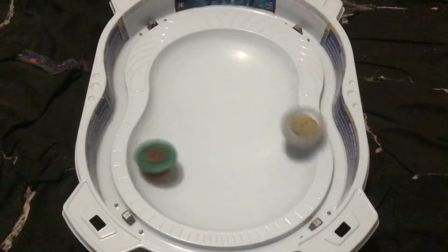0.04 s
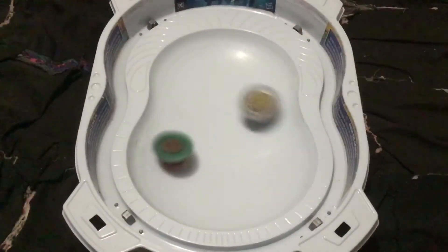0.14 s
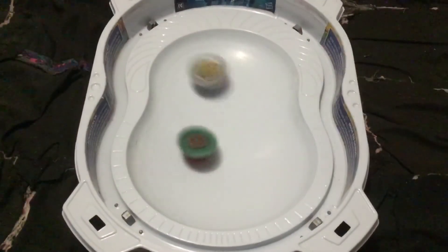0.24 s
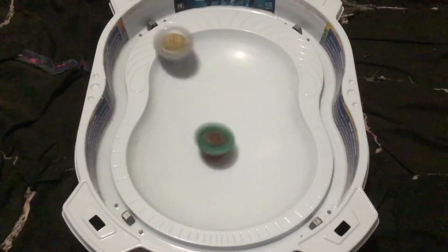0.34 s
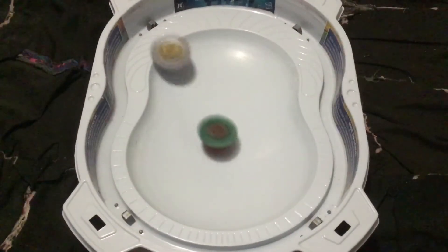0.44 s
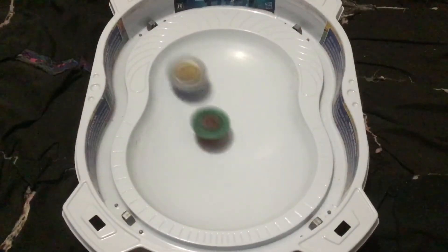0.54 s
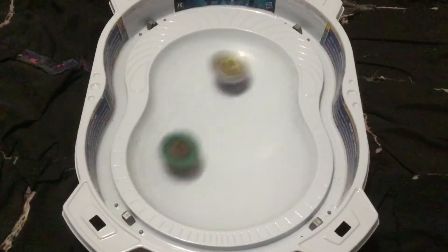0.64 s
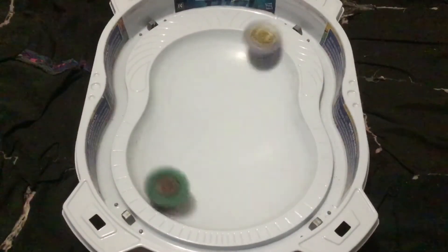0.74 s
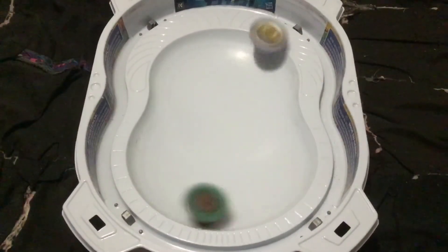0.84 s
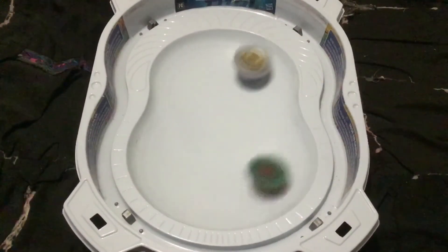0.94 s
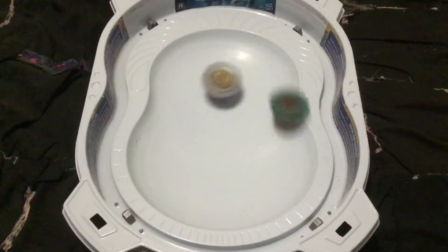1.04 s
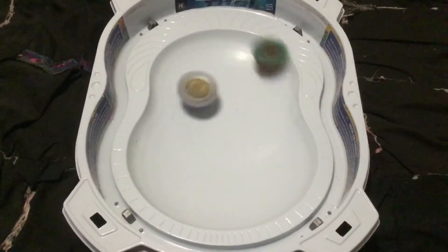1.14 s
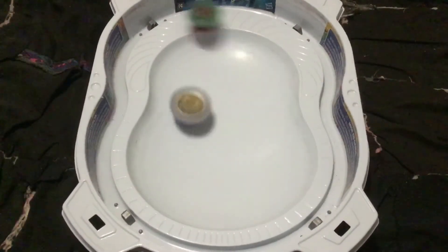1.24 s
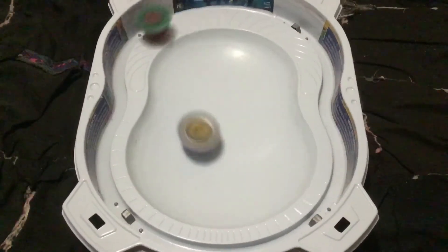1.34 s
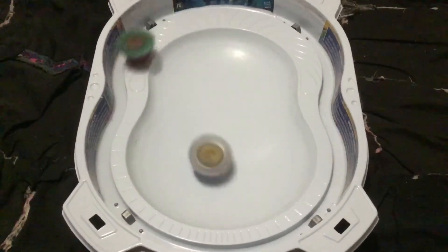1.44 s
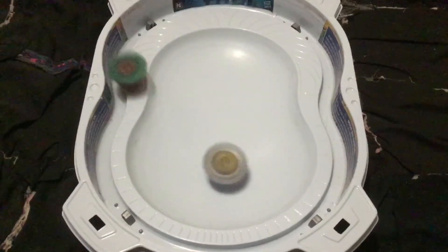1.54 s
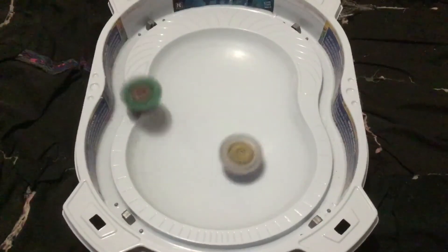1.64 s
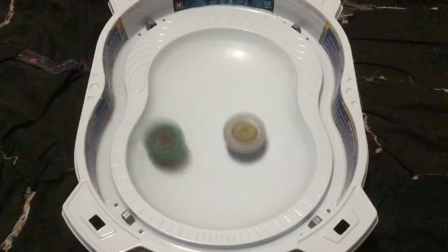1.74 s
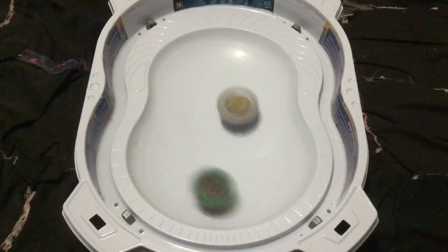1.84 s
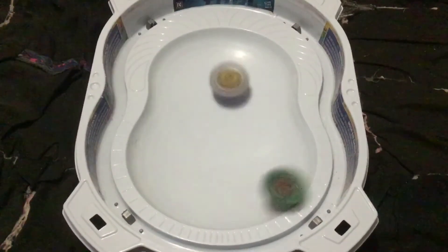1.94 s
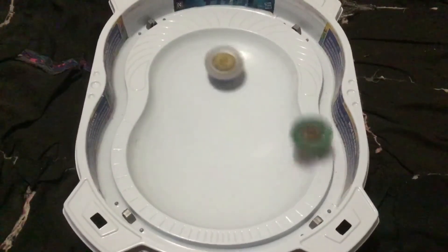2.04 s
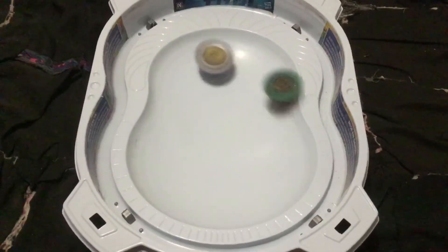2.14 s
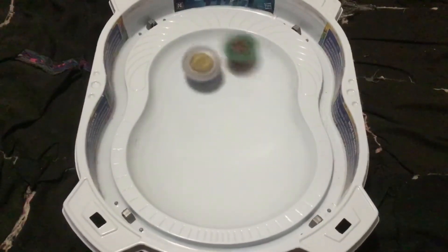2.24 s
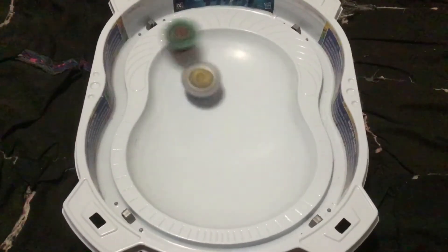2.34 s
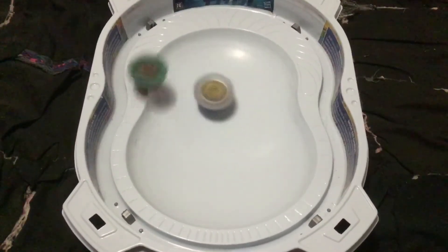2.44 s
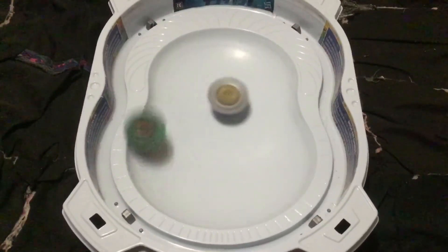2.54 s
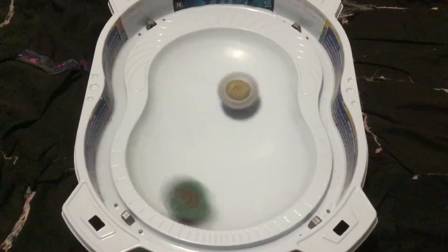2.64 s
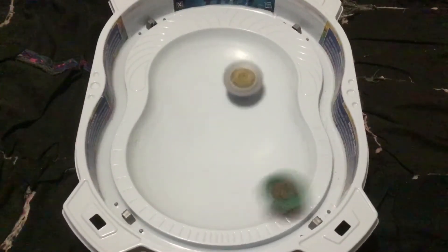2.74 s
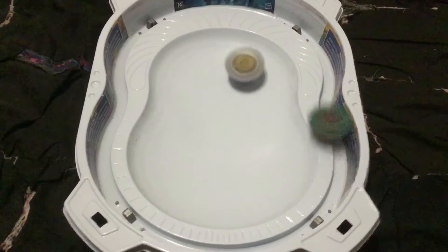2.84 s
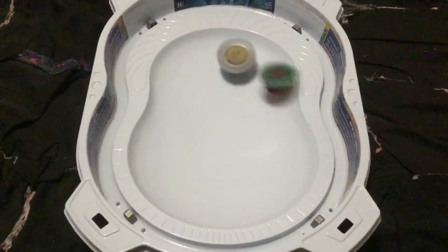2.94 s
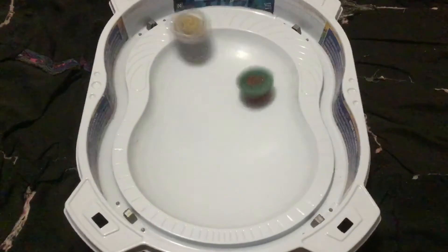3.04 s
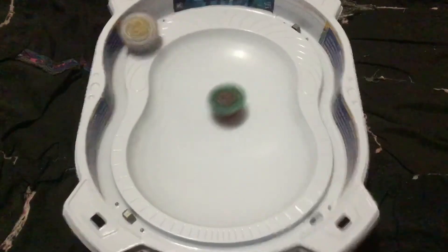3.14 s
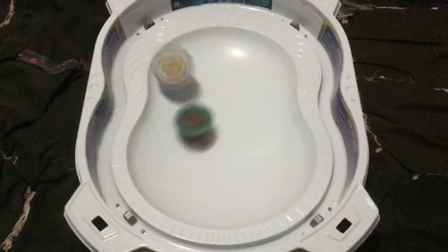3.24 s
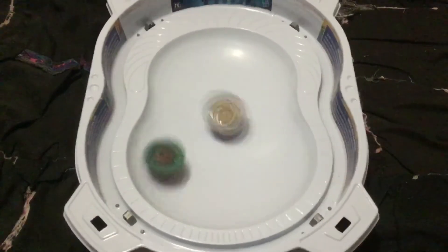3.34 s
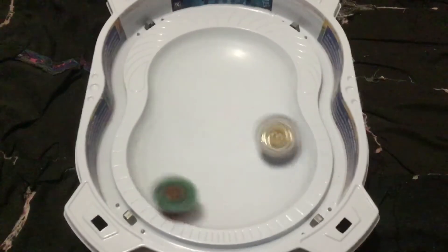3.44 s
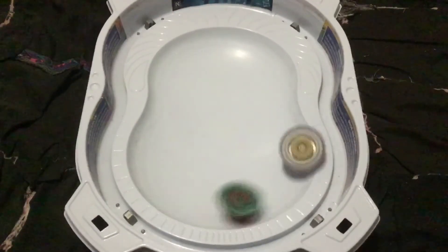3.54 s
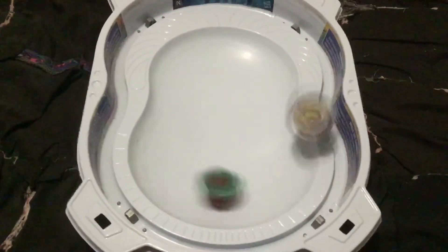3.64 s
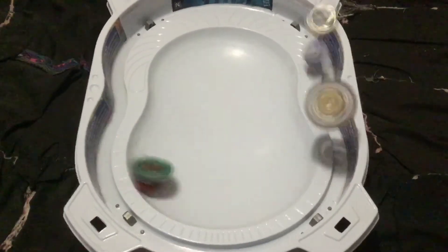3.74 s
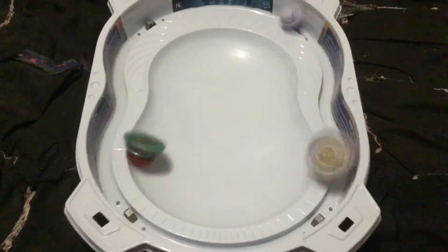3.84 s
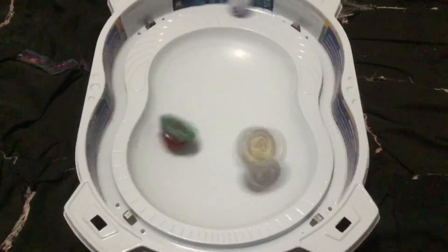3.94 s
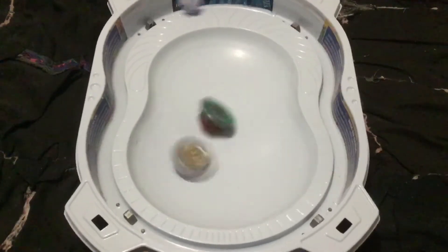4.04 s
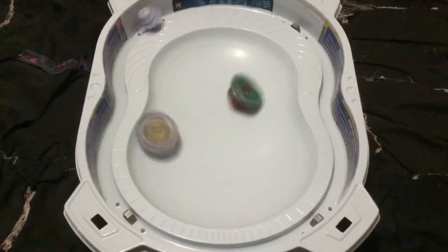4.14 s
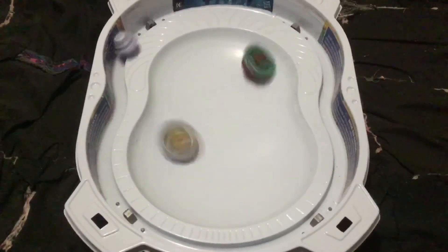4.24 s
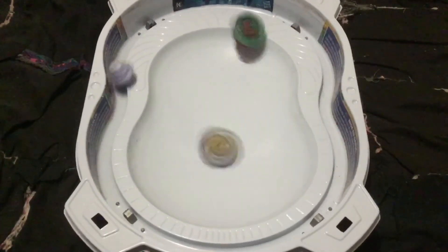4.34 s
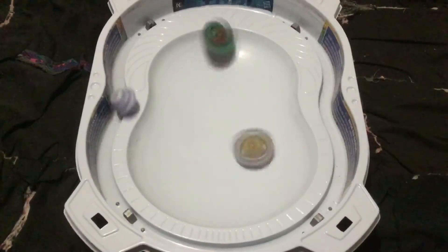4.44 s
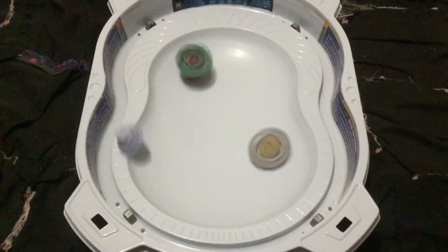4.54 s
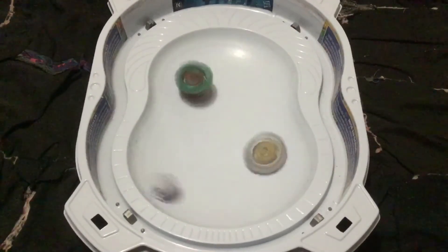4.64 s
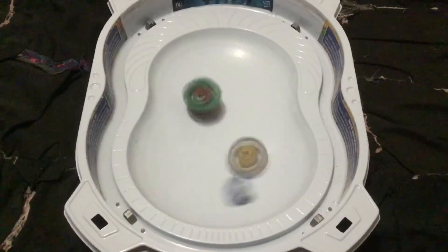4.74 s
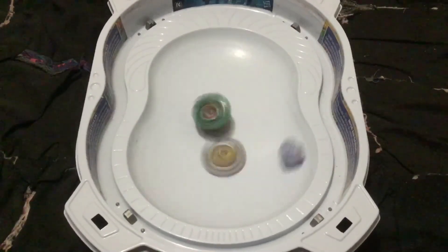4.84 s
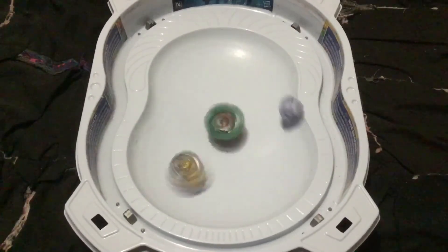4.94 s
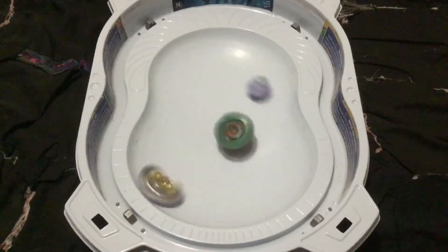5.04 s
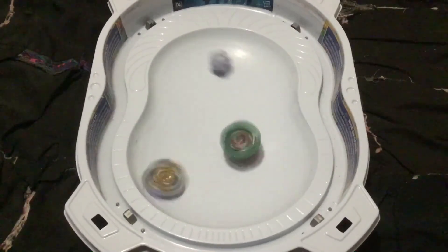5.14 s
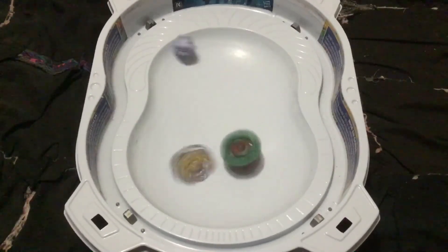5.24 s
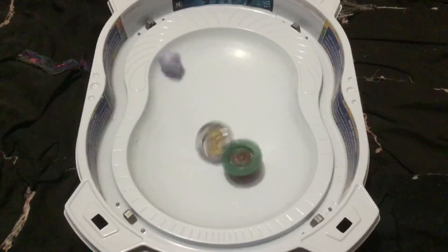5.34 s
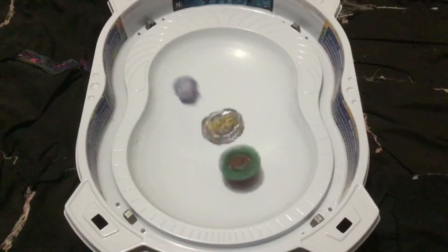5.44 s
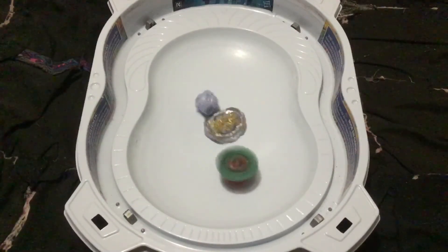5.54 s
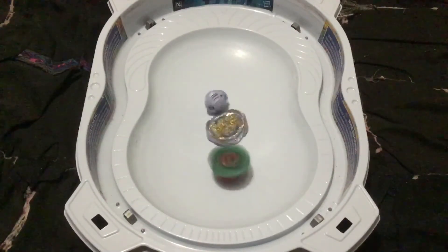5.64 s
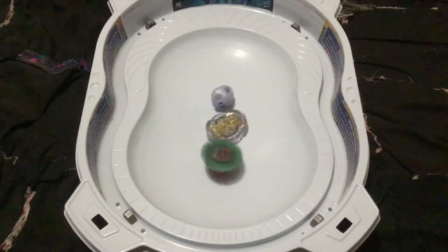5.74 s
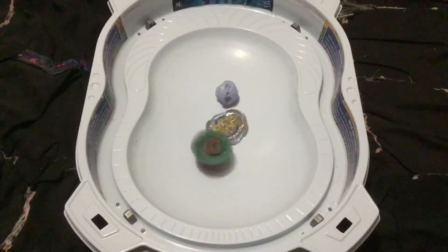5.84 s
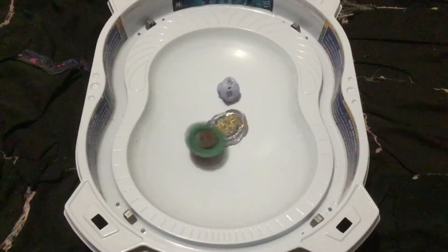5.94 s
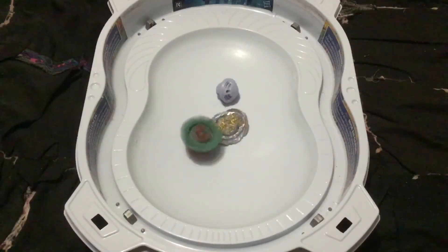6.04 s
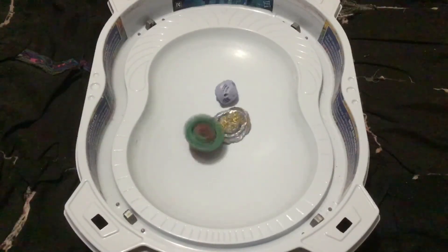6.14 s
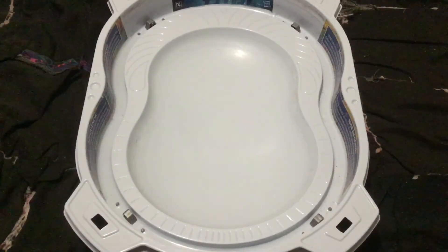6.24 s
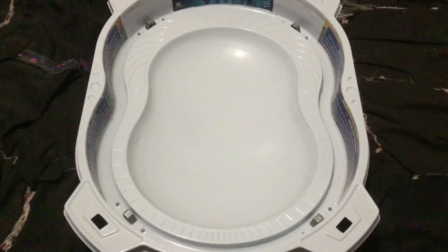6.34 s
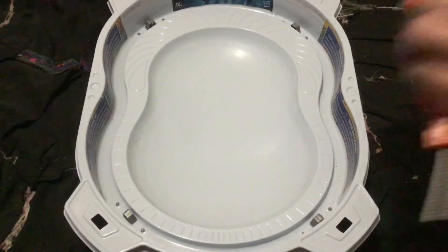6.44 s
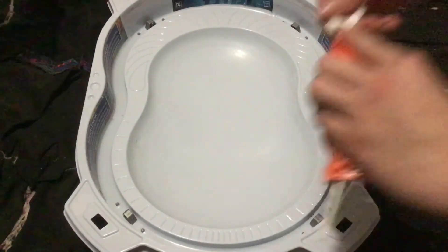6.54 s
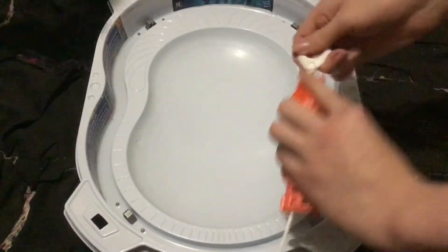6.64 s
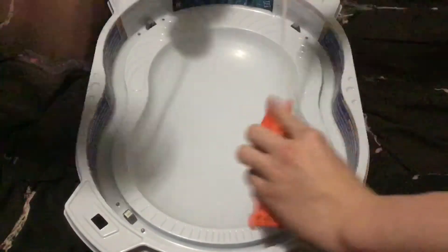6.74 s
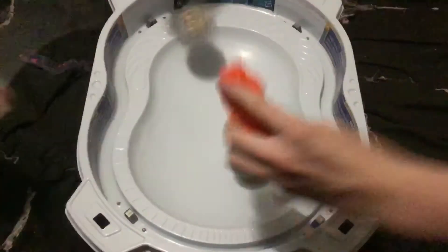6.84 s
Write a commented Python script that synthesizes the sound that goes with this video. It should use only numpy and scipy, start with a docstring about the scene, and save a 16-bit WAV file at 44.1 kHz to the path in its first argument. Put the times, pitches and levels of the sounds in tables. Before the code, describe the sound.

Hollow plastic knocks, buzzing rail scrapes and hard metallic clacks come in quick, irregular bursts as two tops battle in a toy bowl, miked closely from above in a small dry room. After one breaks apart its pieces clatter lightly and settle into weak whirring. An abrupt cut leaves quiet; then a short rising ripcord rip with clicking teeth and several deep, drum-like thumps.

```python
"""In a small room, from close above a thin plastic stadium, one microphone hears two spinning tops.
They roll, grind along the ribbed rail and clash; noisy forces and blows ring the bowl's resonances.
One bursts, and its parts tumble round the bowl in light taps; the rolling and rattling is then cut off.
In a second scene a ripcord launcher zips, its teeth clicking, and fresh tops thud onto the bowl's floor."""
import sys
import numpy as np
from scipy import signal
from scipy.fft import rfft, irfft, next_fast_len
from scipy.io import wavfile
from scipy.ndimage import map_coordinates

SR = 44100
rng = np.random.default_rng(int(sys.argv[2]) if len(sys.argv) > 2 else 0)


def persist_wave(psi):
    """Save psi, clipped to +-1, as 16-bit WAV."""
    counts = np.round(np.clip(psi, -1, 1) * 32767).astype(np.int16)
    wavfile.write(sys.argv[1], SR, np.atleast_2d(counts).T)


N = 303849

TIME = np.arange(N) / SR  # s from the start
AGE = np.arange(16384) / SR  # s from a blow
# bands of the bowl's sound, Hz
THUD, FLOOR, WALL, CRACK = (75, 380), (400, 900), (950, 2200), (2200, 6500)
METAL = (3000, 17000)  # band of the ringing discs, Hz


def rolling(grain_rate=1800, spread_db=4, spin_hz=48, throb_db=7, bump_rate=90, parts_rumble_db=-4):
    """Tips and loose parts catch on the plastic in tiny slips, harder once a turn, and hop over its bumps."""
    run_rumble, run_shell, run_scrape = runs()
    parts_gain = amp(rattle_db(TIME)) * (TIME > RATTLE[0][0])
    clatter, parts_scrape = parts_gain

    # slips per second, the spin rate wandering about spin_hz
    turns = np.cumsum(spin_hz * amp(1.5 * wobble(3))) / SR
    slip_happens = rng.random(N) < grain_rate / SR
    slips = slip_happens * rng.standard_normal(N) * amp(spread_db * rng.standard_normal(N))
    force = unit(np.tanh(slips / 4)) + .5 * rng.standard_normal(N)
    force = force * amp(throb_db * np.sin(2 * np.pi * turns))
    force = force + amp(-3.5) * signal.fftconvolve(force, echoes(count=1)[0])[:N]

    # the tips wander over the bowl, so the mix of its resonances keeps changing
    spots = bowl(np.tile(force, (3, 1)), scatter_db=2.5)
    wandering = sum(spot * wobble(13) for spot in spots)
    steady = bowl(force)

    bumps = (rng.random(N) < bump_rate / SR) * rng.uniform(0.76, 1, N)
    tip_rumble = unit(band(bowl(unit(bumps) + 0.14 * unit(force)), THUD)) * run_rumble
    parts_rumble = unit(band(steady, (170, 380))) * clatter * amp(parts_rumble_db)
    shell = unit(band(unit(steady) + .5 * unit(wandering), (FLOOR[0], WALL[1])))
    shell = shell * np.hypot(run_shell, clatter)
    scrape = unit(band(steady, (2500, 15000))) * np.hypot(run_scrape, parts_scrape)
    return (tip_rumble + parts_rumble + shell + scrape) * until_cut()


# a top runs over the floor between two jumps; levels once it has settled
# columns: touch-down t/s, lift-off t/s, rumble level/dB, scrape level/dB
RUNS = [(0, 0.224, -38.5, -50.5), (0.244, 0.517, -36, -48), (0.585, 0.975, -33.5, -46),
        (1.073, 1.461, -41, -53), (1.485, 1.66, -39.5, -51), (1.688, 2.032, -40.5, -45),
        (2.103, 2.406, -36, -46.5), (2.489, 2.9, -39, -46), (2.941, 3.08, -47.5, -45.5),
        (3.09, 3.216, -40.5, -48.5), (3.241, 3.53, -49, -44), (3.54, 3.703, -42.5, -48),
        (3.976, 5.33, -40, -54.5)]
TOUCH_S, SETTLE_S, LIFT_T60 = 0.004, 0.097, 0.27  # s: a run sets in, calms down, dies away
LANDING_DB, LANDING_SCRAPE_DB = 13, 7.5  # extra level just after touch-down
RUN_SHELL_DB = -43  # the bowl's ring under a calmly running top


def runs():
    """Gains of rumble, bowl and scrape: a top lands roughly, settles, and fades when it lifts off."""
    rumble = shell = scrape = 0
    for start, end, rumble_db, scrape_db in RUNS:
        age = np.maximum(TIME - start, 0)
        touch = np.minimum(age / TOUCH_S, 1) * fade(LIFT_T60, np.maximum(TIME - end, 0))
        unrest = np.exp(-age / SETTLE_S)
        pressure = touch * amp(LANDING_SCRAPE_DB * unrest)
        rumble = rumble + touch * amp(rumble_db + LANDING_DB * unrest)
        shell = shell + pressure * amp(RUN_SHELL_DB)
        scrape = scrape + pressure * amp(scrape_db)
    return rumble, shell, scrape


# passes along the ribbed rail, levels at the loudest moment
# columns: loudest t/s, rasp level/dB, rise t/s, fall t/s, one turn of the top t/s,
# body of the bites level/dB, their crack level/dB
PASSES = [(.016, -23.5, 0.12, 0.1034, 0.026, -23, -25), (1.148, -51, 0.086, .014, 0.016, -19.5, -24),
          (1.959, -31, 0.12, 0.089, 0.017, -23, -31.5), (2.314, -28, 0.1, 0.091, 0.019, -17, -27),
          (2.722, -26, 0.15, 0.052, 0.02, -22, -31), (2.794, -25.5, .02, 0.074, .02, -29.5, -47),
          (3.099, -31.5, .04, 0.085, .02, -46, -48), (3.792, -36, .12, 0.079, 0.02, -21, -25),
          (3.966, -49.5, 0.1, .024, 0.027, -20, -25)]


def grinding(rib_hz=260, spin_hz=54, throb_db=3, floor_db=-3):
    """A top races along the rail: its toothed tip rasps over the ribs, pressing harder once a turn."""
    gain = sum(amp(db + swell_db(TIME - s, rise, fall)) for s, db, rise, fall, *_ in PASSES)
    # both rates wander about their settings
    ribs = np.cumsum(rib_hz * amp(2.5 * wobble(40))) / SR % 1
    turns = np.cumsum(spin_hz * amp(1.0 * wobble(14))) / SR
    force = rng.standard_normal(N) * np.exp(-3.5 * ribs) * amp(throb_db * np.sin(2 * np.pi * turns))
    shell = bowl(force)
    rail = unit(band(shell, (750, 6000))) + .5 * unit(band(force, (700, 2800)))
    return (unit(rail) + amp(floor_db) * unit(band(shell, FLOOR))) * gain


def bites(count=4, contact_s=.02, thud_db=-17, floor_db=-2, tick_db=-19, edge_share=1.0):
    """On the rail the top's edge bites once a turn, body and crack swelling with the pass."""
    rows = []
    for s, _, rise, fall, turn, body_db, crack_db in PASSES:
        for t in turn * np.arange(-count, count + 1):
            if -rise < t < fall and s + t > 0:
                rows.append((s + t, body_db, crack_db, swell_db(t, rise, fall)))
    s, body_db, crack_db, swell = np.transpose(rows)
    body, edge = body_db + swell, crack_db + edge_share * swell
    levels = (body + thud_db, body + floor_db, body, edge, edge + tick_db)
    return bowl_blows(s, contact_s, push_db=-0.5, levels=levels)


PASS_DROP_DB, PASS_SHAPE = 30.5, 1.8  # fall in level over the rise or fall time; roundness of the swell


def swell_db(t, rise, fall):
    """Level of a pass along the rail, t seconds from its loudest moment."""
    return -PASS_DROP_DB * np.abs(np.where(t < 0, t / rise, t / fall)) ** PASS_SHAPE


# hard blows against the rail
# columns: t/s, floor level/dB, wall level/dB, crack level/dB
KNOCKS = [(.3, -28.5, -26, -31.5), (.334, -11.5, -12.5, -22), (.369, -15.5, -14, -23),
          (0.39, -28, -34, -29.5), (.656, -9, -11.5, -16.5), (.7345, -14.5, -16.5, -23.5),
          (0.789, -21, -22, -29), (0.8242, -10.5, -16, -19), (1.463, -32, -19.5, -25.5),
          (1.591, -36.5, -32, -41), (1.66, -29, -37, -33.5), (1.884, -23.5, -30, -33),
          (2.785, -24, -22.5, -30), (2.792, -28, -21, -27.5), (2.959, -23.5, -22.5, -26.5),
          (3.104, -22, -27.5, -58), (3.613, -26, -22, -38), (3.807, -13.5, -20.5, -20),
          (4.028, -44, -26.5, -31.5), (4.231, -27, -23.5, -37), (4.482, -26.5, -29.5, -36),
          (4.514, -31, -30, -42), (5.238, -30, -36, -35.5)]


def knocks(contact_s=0.027, push_db=2, clean_slope=0.27, thud_db=-14, tick_db=-14):
    """A top slams into the rail and rings floor and wall; thud follows floor, tick follows crack."""
    s, floor_db, wall_db, crack_db = np.transpose(KNOCKS)
    # a square hit is one clean push, a graze mostly chatter
    square_db = clean_slope * (floor_db - np.median(floor_db))
    levels = (floor_db + thud_db, floor_db, wall_db, crack_db, crack_db + tick_db)
    return bowl_blows(s, contact_s, push_db + square_db, levels)


# top against top, levels before the trims in clashes()
# columns: t/s, clack, thud, floor, wall, treble level/dB
CLASHES = [(0.5167, -5, -58, -21, -25.5, -9.5), (1.2325, -13, -30.5, -21.5, -17.5, -25),
           (2.905, -4.5, -28, -22.5, -24, -10), (3.077, -16, -34.5, -26.5, -18.5, -30),
           (3.2184, -24.5, -50, -35.5, -40.5, -34.5), (3.5405, -4.5, -26, -25, -24.5, -11.5),
           (4.836, -18.5, -48, -29.5, -32, -29), (5.45, -28.5, -34, -35, -34.5, -36),
           (5.9689, -46, -65, -71, -59.5, -56), (6.0219, -38, -52, -49.5, -44, -55),
           (6.0946, -41.5, -48, -46.5, -47.5, -56)]
# colour of the clack; columns: f/Hz, density level/dB per Hz
CLACK = [(1000, -9), (2500, -3), (4000, 2), (6000, -0.5), (9000, -8), (13000, -14), (16000, -13.5)]


def clashes():
    """The tops' edges clack and the recoil thumps the bowl."""
    s, clack_db, thud_db, floor_db, wall_db, treble_db = np.transpose(CLASHES)
    edges = contacts(len(s), t60=0.039, push_db=-6.5, room_db=-3.0)
    clack = filtered(edges, lambda hz: amp(along(CLACK, hz)))
    tops = strike(s + 0.0011, clack, [((2200, 8000), clack_db - 8.5), ((8000, 17000), treble_db - 5.0)])
    recoil = bowl(contacts(len(s), t60=.02, push_db=2.5, room_db=1), scatter_db=2.5)
    parts = [(THUD, thud_db + 4.5), (FLOOR, floor_db + 5.5), (WALL, wall_db + 1.5)]
    return tops + strike(s + .0015, recoil, parts)


# blows that set a top's disc ringing
# columns: t/s, level/dB, sustain (times the disc's t60), most excited f/Hz
RINGS = [(0.516, -23, 1.5, 13400), (0.657, -29, 0.79, 12260), (.825, -33.5, 1.18, 12400),
         (2.903, -22, 1.7, 12280), (3.079, -29, 0.23, 6260), (3.219, -37, 0.63, 5900),
         (3.541, -34.5, 1.8, 9900), (4.837, -35.5, 1.8, 4020), (5.45, -52.5, .8, 4350),
         (6.023, -45, 0.69, 3800), (6.095, -45.5, 0.38, 3800)]
# modes of the tops' metal-weighted discs; columns: f/Hz, level/dB, t60 t/s
DISC = [(3650, -3.5, 0.15), (4140, -5, .12), (4280, -7, .14), (5090, 0.5, 0.08), (5950, -6.5, 0.22),
        (6900, -10.5, 0.092), (7700, -9.5, 0.08), (9000, -10.5, 0.11), (10350, -8.5, 0.21),
        (10900, -9.5, 0.19), (12300, -7.5, 0.15), (12600, -16, .22), (12770, -9.5, .1),
        (13400, -3.5, 0.094), (14280, -15, 0.14)]


def discs(favour_db=12, reach_hz=500, soft_db=9):
    """Where a disc is struck decides which mode sings loudest; a low-pitched blow barely wakes the high ones."""
    s, db, sustain, hz = np.transpose(RINGS)
    struck_hz = hz[:, None]
    softness = np.clip(1 - struck_hz / DISC[-1][0], 0, 1)

    def favour(mode_hz):
        """Extra dB of a mode for each blow."""
        nearness = np.exp(-((mode_hz - struck_hz) / reach_hz) ** 2)
        return favour_db * nearness - soft_db * softness * np.log2(mode_hz / DISC[0][0])

    return strike(s, ringing(DISC, sustain, favour, detune=.006, blur=31), [(METAL, db)])


# blows that ring the hollow rim; columns: t/s, level/dB
RIM_HITS = [(1.236, -23.5), (1.464, -15), (1.48, -17), (1.661, -36.5), (2.795, -28), (3.08, -19),
            (3.105, -35.5), (3.613, -21), (3.809, -24)]
# modes of the hollow rim; columns: f/Hz, level/dB, t60 t/s
RIM = [(265, -8, 0.14), (649, -17.5, 0.11), (1017, -23.5, .18), (1172.5, 3, 0.11), (1320, -12, 0.051),
       (1640, -20.5, 0.081), (2150, -18, 0.12), (2375, -23, .1)]


def rim():
    """A top that jumps the rail knocks on the hollow rim."""
    s, db = np.transpose(RIM_HITS)
    rings = ringing(RIM, np.ones(len(s)), lambda hz: 0, detune=0.011, blur=2.5)
    return strike(s, rings, [((150, 3000), db)])


def ringing(modes, sustain, boost_db, detune, blur, scatter_db=4):
    """One ring per blow: every mode at a new strength, its phase wandering as the part moves."""
    count, ring = len(sustain), 0
    for hz, db, t60 in modes:
        size, shift, phase = rng.standard_normal((3, count, 1))
        drift = blur * np.cumsum(rng.standard_normal((count, len(AGE))), axis=1) / np.sqrt(SR)
        wave = np.sin(2 * np.pi * (hz * (1 + detune * shift) * AGE + phase) + drift)
        gain = amp(db + scatter_db * size + boost_db(hz))
        ring = ring + gain * fade(t60 * sustain[:, None]) * wave
    return ring * (1 - fade(0.0045))


# blows hard enough to bend the floor; columns: t/s, level/dB
FLEXES = [(0.518, -25), (0.657, -25), (0.825, -32), (2.907, -15.5), (3.542, -23.5), (6.714, -16),
          (6.732, -18.5), (6.742, -25.5), (6.766, -21), (6.839, -15.5)]


def flex(start_hz=330, end_hz=46, sweep=0.006, t60=0.047):
    """A hard blow bends the thin floor; short waves arrive first, so the thump falls in pitch."""
    s, db = np.transpose(FLEXES)
    hz = end_hz + (start_hz - end_hz) * np.exp(-AGE / sweep)
    thump = np.sin(2 * np.pi * np.cumsum(hz) / SR) * fade(t60) * (1 - fade(0.074))
    return strike(s, thump[None], [((42, 500), db)])


# a top or a loose part drops flat on the floor
# columns: t/s, floor level/dB, thud level/dB, crack level/dB
DROPS = [(.093, -28.5, -28.5, -56.5), (.274, -24.5, -20.5, -42), (.415, -21, -23, -37),
         (0.582, -43, -41, -43), (1.05, -23, -22.5, -34), (1.084, -28, -40, -40), (1.697, -39, -32, -38),
         (1.852, -43, -34, -37.5), (2.096, -29.5, -27, -37.5), (2.122, -50, -31, -61),
         (2.144, -48, -38, -46), (2.223, -40, -31, -34), (2.493, -29.5, -35, -37), (2.794, -31, -21, -36),
         (3.221, -47, -30.5, -41.5), (3.731, -24.5, -25.5, -29.5), (3.813, -13.5, -24, -19),
         (3.984, -19.5, -25.5, -30), (4.06, -17.5, -32, -29), (4.148, -18, -41, -39),
         (4.177, -30, -25, -35), (4.209, -24, -27.5, -30.5), (4.369, -35, -35, -32),
         (4.54, -25, -32, -35.5), (4.77, -32.5, -44, -39), (4.974, -25, -35, -49),
         (5.103, -25.5, -27, -47.5), (5.126, -27.5, -44, -44.5), (5.29, -28, -38, -49),
         (5.346, -38, -35, -49.5)]


def drops(contact_s=0.018, wall_db=-3, tick_db=-11):
    """Flat landings drive the floor; the wall's level follows the crack."""
    s, floor_db, thud_db, crack_db = np.transpose(DROPS)
    levels = (thud_db, floor_db, crack_db + wall_db, crack_db, crack_db + tick_db)
    return bowl_blows(s, contact_s, push_db=0, levels=levels)


TUMBLE_S = (3.98, 5.38)  # the loose parts tumble from, until (s)


def rattling(count=46, spread_db=3, contact_s=0.013, push_db=4,
             thud_db=-7, floor_db=1, wall_db=6, crack_db=6, tick_db=-4):
    """The parts of the burst top tumble over the floor in light, sharp, uneven taps."""
    s = scattered_times(*TUMBLE_S, count)
    clatter_db, scrape_db = rattle_db(s)
    weight, edge = spread_db * np.clip(rng.standard_normal((count, 2)), -1.2, 1.2).T
    low, high = clatter_db + weight, scrape_db + edge
    levels = (low + thud_db, low + floor_db, high + wall_db, high + crack_db, high + tick_db)
    return bowl_blows(s, contact_s, push_db, levels)


# one top wobbles, bursts, and its parts rattle on until the cut
# columns: t/s, clatter level/dB, scrape level/dB
RATTLE = [(3.37, -42, -65.5), (3.42, -29, -58), (3.54, -28.5, -38), (3.691, -41, -50), (3.83, -25.5, -32),
          (3.92, -34, -56), (4.2, -24, -38.5), (4.45, -35, -47.5), (4.7, -36.5, -51), (5.13, -35, -51),
          (5.33, -44, -64), (5.4, -59, -66), (5.46, -35, -42), (5.6, -54, -65.5), (5.8, -56.5, -71),
          (6.16, -59.5, -68)]


def rattle_db(t):
    """Clatter and scrape levels of the wobbling top and its parts at times t."""
    when, clatter_db, scrape_db = np.transpose(RATTLE)
    return np.interp(t, when, clatter_db), np.interp(t, when, scrape_db)


# the last top brushing the loose disc; columns: t/s, level/dB before the trims in whirring()
WHIRR = [(5.3, -68), (5.5, -45), (5.62, -62), (5.75, -58.5), (5.9, -60.5), (6.02, -50.5), (6.17, -50.5)]
# resonances of the loose disc; columns: f/Hz, width f/Hz, level/dB
LOOSE = [(3720, 280, 5.5), (4430, 81, 1.5), (5780, 61, -18.5), (7300, 310, -18.5)]
LEAN_S = 5.58  # the last top starts to tap the disc
CUT_S = 6.172  # the rolling, rattling and whirring are cut off


def whirring(wobble_hz=27, throb_db=4, tap_db=1, bowl_db=-1, count=13):
    """The last top leans on the loose disc, which buzzes faintly and taps against the bowl."""
    whirr_db, = curves(WHIRR)
    force = rng.standard_normal(N) * amp(throb_db * wobble(2 * wobble_hz))
    buzz = unit(resonate(force, LOOSE)) * amp(whirr_db - 9.5) * (TIME > WHIRR[0][0])
    s = scattered_times(LEAN_S, CUT_S, count)
    db = np.interp(s, TIME, whirr_db) + tap_db + 2 * rng.standard_normal(count)
    touch = contacts(count, t60=0.0198, push_db=1, room_db=-12)
    disc = strike(s, resonate(touch, LOOSE, scatter_db=4), [(METAL, db - 9.5)])
    tapped_bowl = strike(s, bowl(touch), [((FLOOR[0], CRACK[1]), db + bowl_db)])
    return (buzz + disc + tapped_bowl) * until_cut()


def until_cut():
    """Gain 1 until the cut, then 0, with a 10 ms ramp between."""
    return np.clip((CUT_S - TIME) / .01 + .5, 0, 1)


# the ripcord pull, two catches and then the long rip; columns: t/s, level/dB
PULL = [(6.59, -71), (6.603, -43.5), (6.63, -47.5), (6.637, -29), (6.67, -31), (6.72, -14), (6.748, -14.5),
        (6.81, -32.5), (6.89, -41.5)]
# resonances of the launcher; columns: f/Hz, width f/Hz, level/dB
LAUNCHER = [(566, 350, -13.5), (1760, 650, -13.5), (2675, 200, -2.5), (3130, 200, -2), (3970, 190, -0.5),
            (4500, 110, -1), (5270, 870, -4.5), (6176, 570, -2.5), (7270, 40, 6), (7640, 120, -2),
            (8300, 1200, -9.5), (9800, 325, -2), (10600, 2800, -10.5), (15300, 1600, -16)]


def launcher(tooth_hz=900, rub=2.34):
    """The ripcord rubs through its slot and its teeth run over the gear, faster as the pull grows."""
    pull_db, = curves(PULL)
    # tooth_hz is reached at the strongest pull
    rate = tooth_hz * amp(.3 * (pull_db - pull_db.max()))
    tooth = np.floor(np.cumsum(rate) / SR)
    clicks = np.diff(tooth, prepend=0) * amp(7.4 * rng.standard_normal(N))
    force = clicks * np.sqrt(SR / tooth_hz) + rub * rng.standard_normal(N)
    return unit(resonate(force, LAUNCHER)) * amp(pull_db) * (TIME > PULL[0][0])


# launched tops landing, levels before the trims in landings()
# columns: t/s, thud, floor, wall, crack level/dB
LANDINGS = [(6.714, -21, -19.5, -15, -31.5), (6.73, -6, -35, -31, -32.5), (6.74, -6, -26, -14.5, -28.5),
            (6.763, -1, -12.5, -37, -40), (6.838, -2, -11, -57, -26.5)]


def landings():
    """Dropped tops push the floor of the bowl like a drum skin."""
    s, thud_db, floor_db, wall_db, crack_db = np.transpose(LANDINGS)
    sounds = bowl(contacts(len(s), t60=0.0054, push_db=0, room_db=-4))
    parts = [(THUD, thud_db - 14.0), (FLOOR, floor_db - 6.5), (WALL, wall_db - 20), (CRACK, crack_db - 9.0)]
    return strike(s + 0.00092, sounds, parts)


# resonances of the stadium; columns: f/Hz, width f/Hz, level/dB
SHELL = [(75, 24, -2.5), (119, 51, -0.5), (208, 87, -5), (305, 51.4, 0), (407.3, 36, -4), (520, 120, -2),
         (655.5, 81, 4), (690, 52, 0.5), (844, 360, -15), (1211, 144, -5.5), (1428, 140, -15),
         (1665, 253, -12), (1957, 1200, -17.5), (2503, 450, -16), (3142, 403, -19), (3870, 790, -17.5),
         (4880, 1260, -19), (5620, 1540, -22), (8130, 2400, -31), (12500, 8100, -38)]


def bowl(force, scatter_db=0):
    """The thin plastic bowl rings at its resonances under a force."""
    return resonate(force, SHELL, scatter_db)


def bowl_blows(s, contact_s, push_db, levels):
    """Blows on the bowl; levels are the dB of its thud, floor, wall, crack and tick."""
    force = contacts(len(s), contact_s, push_db, room_db=1)
    bands = ((130, 380), FLOOR, WALL, CRACK, (6500, 17000))
    return strike(s, bowl(force, scatter_db=3.0), zip(bands, levels))


def contacts(count, t60, push_db, room_db):
    """One force per blow: a clean push, a short chatter of the spinning rim, and the room's answer."""
    force = rng.standard_normal((count, len(AGE))) * fade(t60)
    force /= np.linalg.norm(force, axis=1, keepdims=True)
    force[:, 0] += amp(push_db)
    return force + amp(room_db) * echoes(count)


def strike(times, sounds, parts):
    """Lay blows on the time line; where one lands decides how hard it drives each (band, dB) part."""
    blows = 0
    for edges, db in parts:
        part = band(sounds, edges)
        attack = np.sqrt(np.mean(part[:, :SR // 50] ** 2, axis=1))  # rms of the first 20 ms
        blows = blows + part * (amp(db) / attack)[:, None]
    out = np.zeros(N + len(AGE))
    for s, blow in zip(times, blows):
        out[round(s * SR):][:len(AGE)] += blow
    return out[:N]


# decay of the small room; columns: f/Hz, t60 t/s
ROOM = [(100, .3), (700, 0.16), (2000, 0.21), (5000, 0.16), (13000, 0.2)]


def echoes(count):
    """Room tails of energy 1; each frequency dies at its own speed."""
    hz, t, z = signal.stft(rng.standard_normal((count, len(AGE))), SR, nperseg=256)
    z = z * fade(along(ROOM, hz)[:, None], t)
    tail = signal.istft(z, SR, nperseg=256)[1][:, :len(AGE)]
    tail = tail * (1 - fade(0.012))
    return tail / np.linalg.norm(tail, axis=1, keepdims=True)


# colour of the quiet room; columns: f/Hz, density level/dB per Hz
HUSH = [(15, -60.5), (25, -36.5), (40, -25.5), (59, -2), (166, -9), (229, -16), (249, -6), (427, -27),
        (659, -23), (754, -31.5), (1230, -28), (1480, -36.5), (14800, -51), (16000, -44)]
HUSH_DB = -55.5  # rms level


def hush():
    """The low background of the room: steady noise in the room's colour."""
    return amp(HUSH_DB) * unit(filtered(rng.standard_normal(N), lambda hz: amp(along(HUSH, hz))))


def amp(db):
    """Decibels to gain."""
    return 10 ** (np.asarray(db) / 20)


def unit(x):
    """Scaled to rms 1."""
    return x / np.sqrt(np.mean(x ** 2) + 1e-20)


def along(points, hz):
    """(Hz, value) points on a log axis."""
    f, v = np.transpose(points)
    return np.interp(np.log(hz + 1), np.log(f + 1), v)


def curves(rows):
    """One value per sample for each column after the time."""
    s, *cols = np.transpose(rows)
    return [np.interp(TIME, s, c) for c in cols]


def scattered_times(first, last, count):
    """One random moment in each of count equal slots."""
    return first + (last - first) * (np.arange(count) + rng.random(count)) / count


def fade(t60, t=AGE):
    """Exponential decay, 60 dB in t60 seconds."""
    return np.exp(-np.log(1000) * t / t60)


def wobble(rate):
    """A smooth random curve, rate knots a second."""
    return map_coordinates(rng.standard_normal(int(N * rate / SR) + 4), [TIME * rate])


def filtered(x, response):
    """x times a complex response of frequency."""
    n = x.shape[-1]
    m = next_fast_len(n + 4096)
    return irfft(rfft(x, m) * response(np.fft.rfftfreq(m, 1 / SR)), m)[..., :n]


def resonate(x, modes, scatter_db=0):
    """Each row of x through a bank of (Hz, width, dB) resonances; each spot drives them differently."""
    hz, width, db = np.transpose(modes)[:, :, None]
    sign = (-1) ** np.arange(len(modes))
    scatter = scatter_db * rng.standard_normal(x.shape[:-1] + (len(modes),))
    gains = sign * amp(db[:, 0] + scatter)
    return filtered(x, lambda f: gains @ (1j * f * width / (hz ** 2 - f ** 2 + 1j * f * width)))


def band(x, edges):
    """Causal band-pass."""
    return signal.sosfilt(signal.butter(N=3, Wn=edges, btype="band", fs=SR, output="sos"), x)


# a brief drop in level at the cut between the two scenes; columns: t/s, level/dB
DIP = [(6.17, -4.5), (6.179, -19.5), (6.186, -20), (6.2, -1)]


def scene():
    """Everything, heard from just above the stadium: the spinning tops, then after the cut the launch."""
    spinning = rolling() + grinding() + bites() + rattling() + whirring()
    blows = knocks() + drops() + clashes() + discs() + rim() + flex()
    launch = launcher() + landings()
    dip_db, = curves(DIP)
    return ((spinning + blows + launch + hush()) * amp(dip_db))[None]


def record(dry, top_hz=16100):
    """Loud peaks are rounded off and the band ends steeply at top_hz."""
    rounded = dry / (1 + np.abs(dry) ** 6) ** (1 / 6)
    return filtered(rounded, lambda hz: 1 / (1 + (hz / top_hz) ** 160))


dry = scene()
out = record(dry)
persist_wave(out)
```